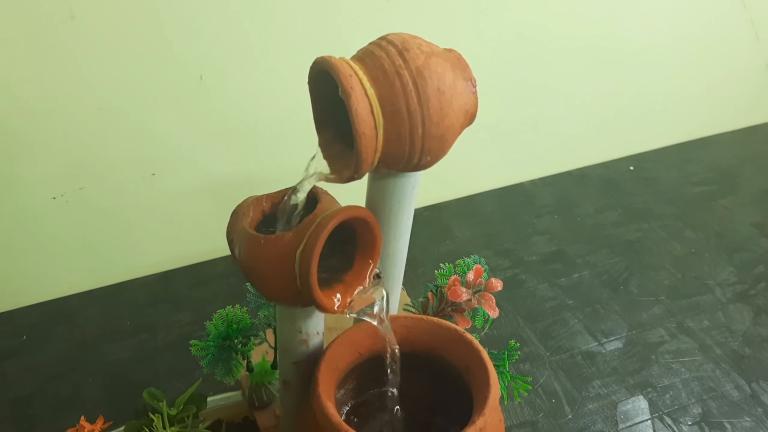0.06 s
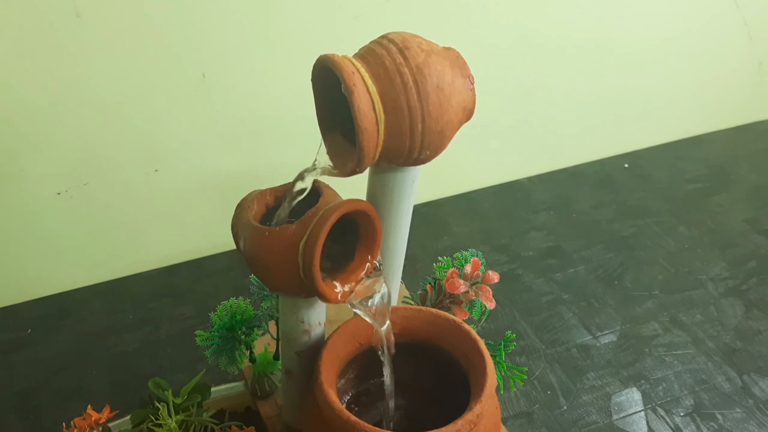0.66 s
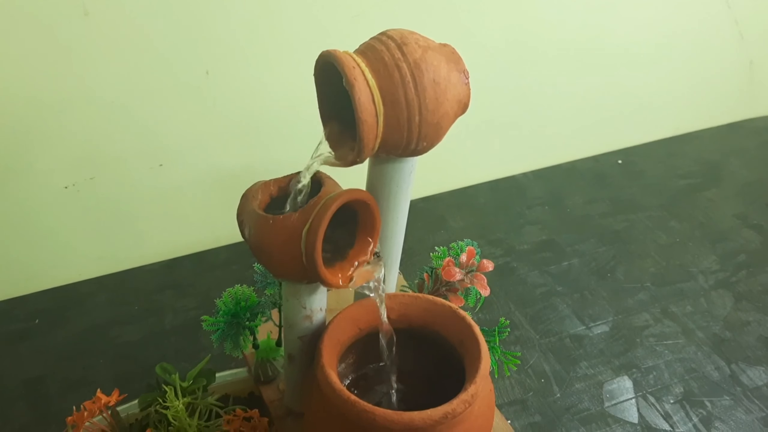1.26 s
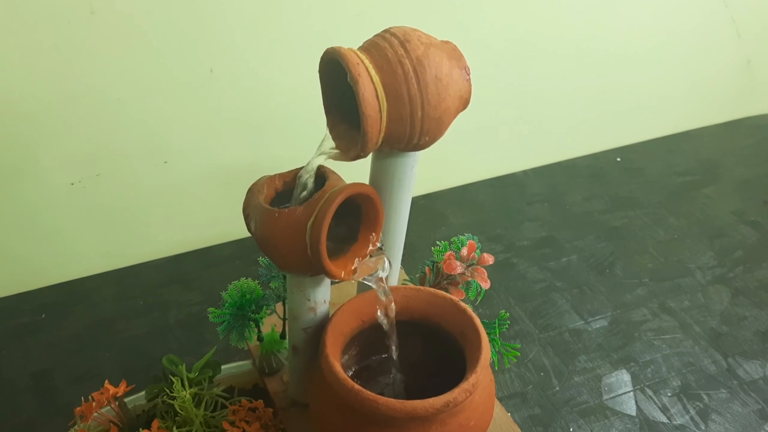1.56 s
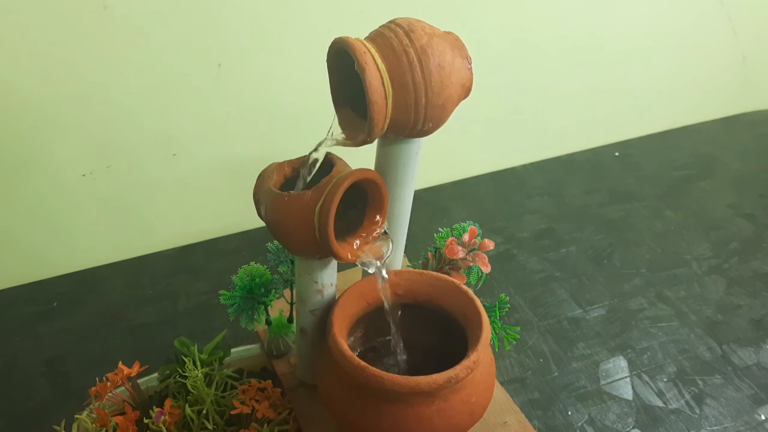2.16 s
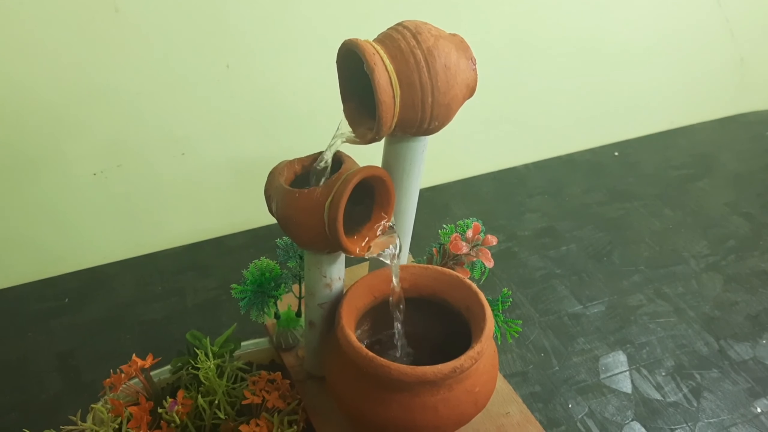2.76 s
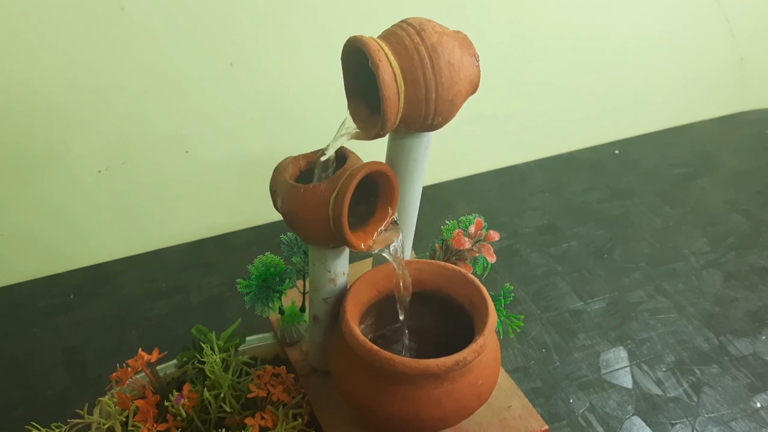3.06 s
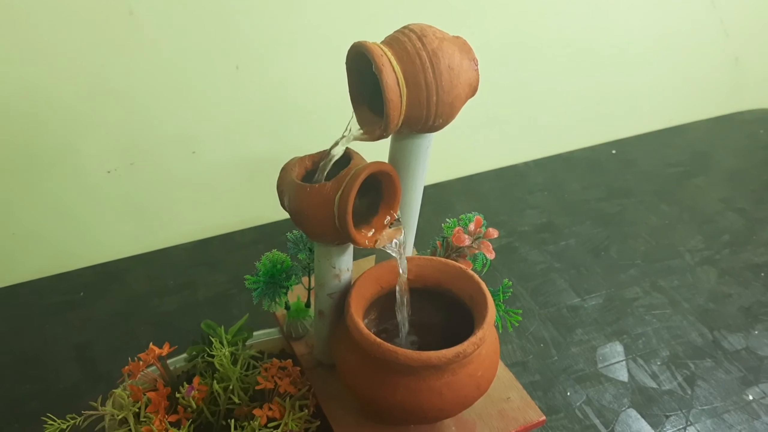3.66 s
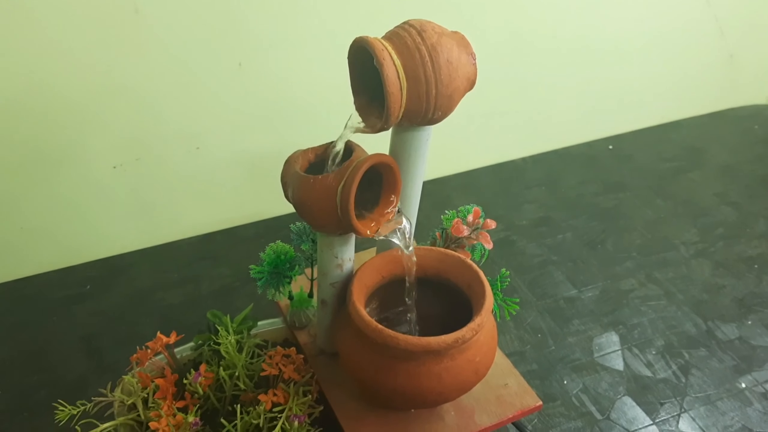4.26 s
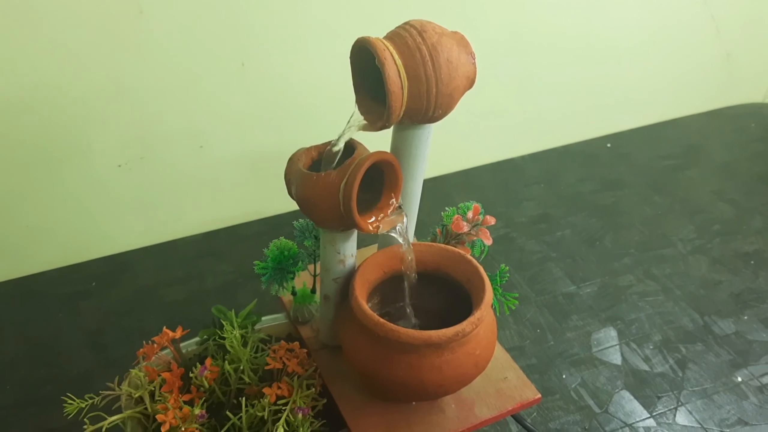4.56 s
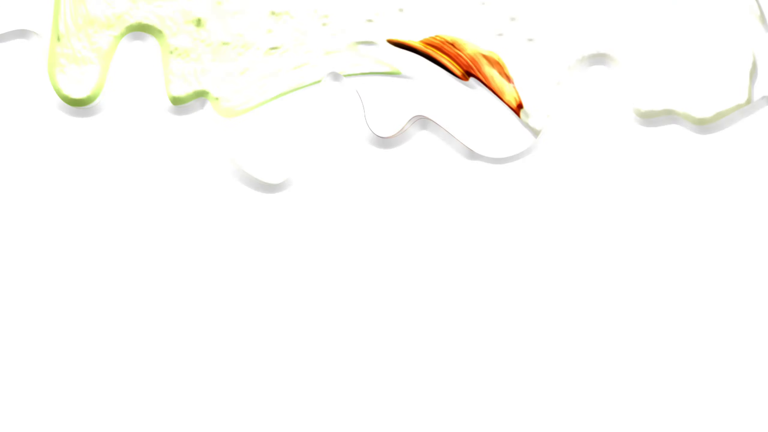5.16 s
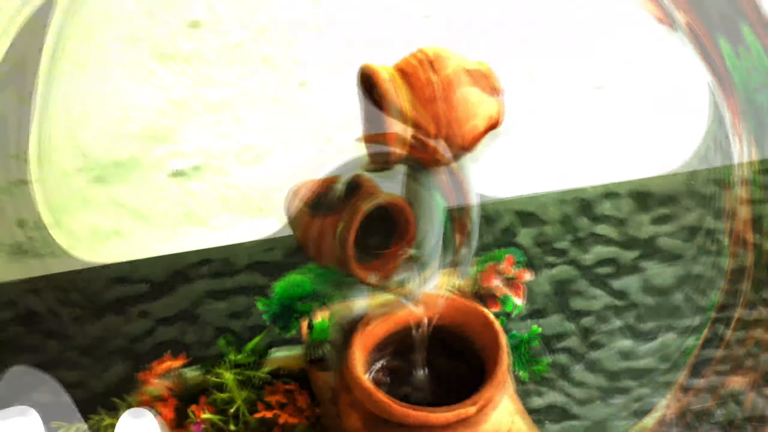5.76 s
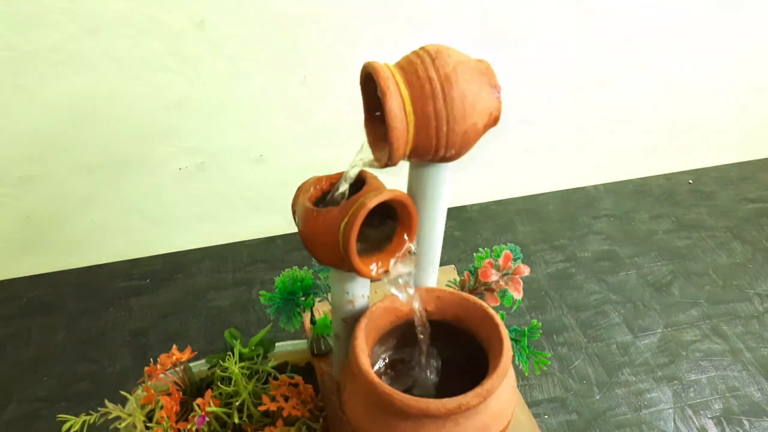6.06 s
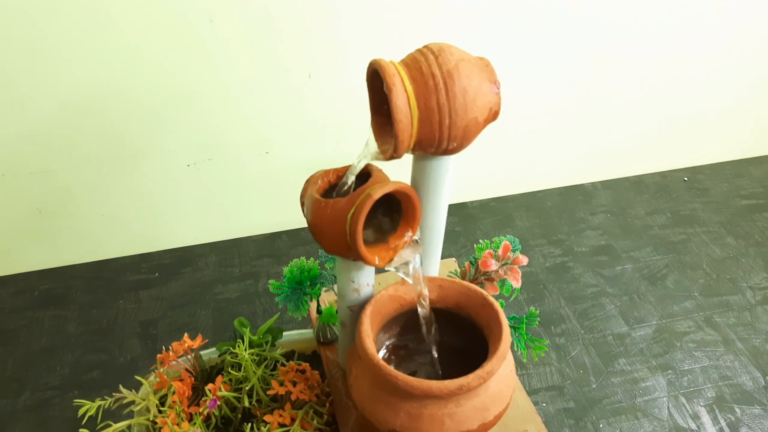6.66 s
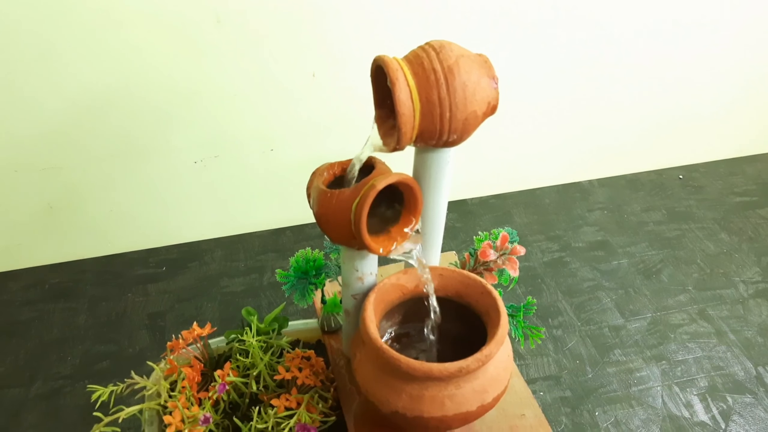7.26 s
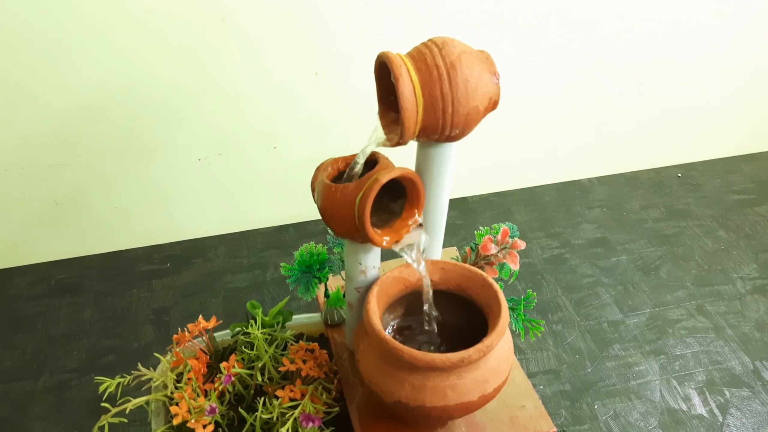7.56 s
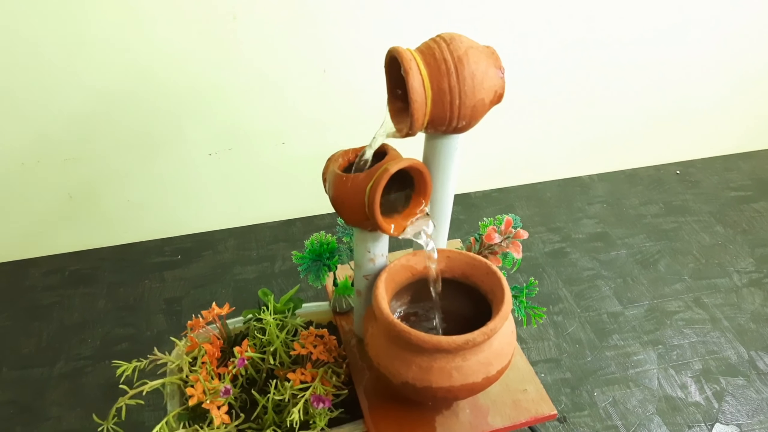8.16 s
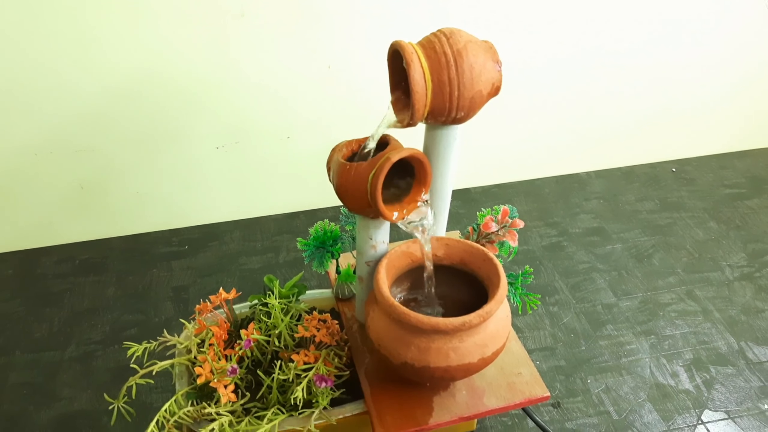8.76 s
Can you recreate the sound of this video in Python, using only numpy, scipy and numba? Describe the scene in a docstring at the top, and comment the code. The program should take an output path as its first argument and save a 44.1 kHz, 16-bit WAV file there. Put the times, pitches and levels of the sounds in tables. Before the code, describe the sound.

A small tabletop fountain of clay pots runs for about nine seconds, heard close by and slightly to the left in a quiet room. From the start, a thin stream breaks into drops that tick and patter on the water in the bottom pot, with a fine crackle of spray and many tiny bubbles that ring briefly. Underneath, soft plops give the pot a hollow gurgling note that keeps sliding up and down. The hardest plunge comes at about 3.1 seconds, and a sharp, bright splat follows at 5.7 seconds. From roughly 6.7 to 7.4 seconds the drops crowd together into a busier splashing, then thin out again while the trickle carries on to the end. Throughout, the pot walls and the room add a light echo over a faint, broad hiss.

```python
"""A small tabletop fountain of clay pots, heard from close by in a quiet room.
From the start a thin stream breaks into drops: they tick on the water and trap bubbles that ring briefly.
The stream plops in the pot, whose hollow note slides up and down; the hardest plunge comes at 3.1 s.
A sharp splat follows at 5.7 s, and the drops crowd together from about 6.7 to 7.4 s, then thin out.
All along, the pot wall and the room echo the water over a faint broad hiss."""
import sys
import numpy as np
from scipy import signal
from scipy.fft import rfft, irfft
from scipy.io import wavfile
from numba import njit

SR = 44100
rng = np.random.default_rng(int(sys.argv[2]) if len(sys.argv) > 2 else 0)


def persist_wave(psi):
    """Save psi, clipped to +-1, as 16-bit WAV."""
    counts = np.round(np.clip(psi, -1, 1) * 32767).astype(np.int16)
    wavfile.write(sys.argv[1], SR, np.atleast_2d(counts).T)


N = 388521

# Levels in the tables are relative: the mix sets how loud each layer ends up.
# Big trapped bubbles: start_s, level_db, pitch_hz, ring_cycles, climb_share (pitch rise per ring time)
BIG_BUBBLES = [(0.063, -18, 2380, 4.3, 0.19), (0.063, -22, 4850, 3.8, -0.013),
               (0.1263, -14.5, 3130, 2.4, 0.086), (0.1668, -32, 1710, 6.6, 0.081),
               (0.2345, -32, 4050, 6.1, 0.032), (0.2675, -21, 3160, 6, 0.26), (0.283, -34, 4430, 5, -0.024),
               (0.4193, -25.5, 3570, 3.7, -0.025), (0.456, -37, 1210, 3.8, -0.023),
               (0.531, -22.5, 2400, 4.8, -0.034), (0.5825, -23, 2260, 3, 0.08),
               (0.6363, -28.0, 2270.0, 5.8, 0.11), (0.6588, -31, 4350, 8.3, 0.012),
               (0.6793, -21.5, 3100.0, 2.5, 0.11), (0.7672, -29.5, 1690.0, 4.2, 0.055),
               (0.7767, -31, 1780.0, 1.2, 0.15), (0.808, -23.5, 4560, 4.3, 0.018),
               (0.872, -22.5, 2720, 6.6, 0.057), (0.8728, -28, 1740, 6.1, 0.12),
               (0.9622, -18.5, 2060, 1.3, 0.023), (1.0416, -24.5, 2270.0, 2.3, 0.21),
               (1.116, -35, 3570, 4.6, -0.0051), (1.1807, -27, 3530.0, 5.1, -0.05),
               (1.2389, -42.5, 1290, 8.9, 0.071), (1.275, -32, 2750, 3.5, 0),
               (1.306, -32.5, 4400, 5, -0.018), (1.3375, -32, 3300, 7.0, 0.0),
               (1.354, -36, 2970, 4.5, -0.039), (1.5123, -22, 1840, 0.62, 0.015),
               (1.515, -42, 1480, 7.8, 0), (1.5854, -33, 3340.0, 5.5, 0.11),
               (1.6215, -29.5, 2110, 3.3, 0.11), (1.6477, -32.0, 2140, 6.5, -0.013),
               (1.8331, -29.5, 2310, 3.8, 0.18), (1.851, -37, 1340.0, 3.6, 0.0),
               (1.8888, -33.5, 1770, 9.2, 0.47), (1.911, -27, 1970, 2.8, -0.018),
               (1.9787, -24, 4860.0, 3.7, -0.013), (2.122, -27, 4960, 4.2, 0.028),
               (2.243, -30, 3480, 7.0, 0.13), (2.2703, -30, 3300.0, 5.8, 0.08),
               (2.3622, -24, 1910.0, 1.6, -0.077), (2.3711, -27, 1590, 3.5, -0.012),
               (2.462, -28.5, 4670.0, 4.3, 0.036), (2.5067, -22, 4900, 5.1, -0.062),
               (2.6031, -32.5, 2240, 7.5, 0.2), (2.6132, -31.5, 1890, 4.7, 0.19),
               (2.6552, -31.0, 1620, 4.9, 0.068), (2.768, -29, 2070, 7.8, 0.097),
               (2.793, -23, 2800, 1.7, 0.02), (2.879, -26.5, 3390, 5.1, -0.038),
               (2.9, -23.5, 4620.0, 4.7, -0.0058), (2.939, -32.5, 1940, 9.0, 0.17),
               (2.9524, -23.5, 5330, 3, -0.067), (2.9667, -29, 4090.0, 3.6, 0.043),
               (2.9927, -33, 1500, 4.9, 0.28), (3.044, -29.5, 2990, 7.0, 0.04),
               (3.056, -28, 2480, 7.0, -0.085), (3.1873, -34, 1210, 1.6, 0.14),
               (3.1967, -26.5, 4490.0, 5.1, 0.26), (3.361, -31, 3760, 11.4, 0.21),
               (3.4312, -30.5, 3070.0, 5.5, 0.17), (3.4445, -26, 2060.0, 5.5, 0.4),
               (3.4675, -24, 1310.0, 0.9, 0.44), (3.493, -35.5, 1970, 11, 0.076),
               (3.5866, -23, 2160, 5.1, 0.11), (3.7076, -28, 1850, 3.8, -0.041),
               (3.7965, -18.5, 2240, 4.4, 0.19), (3.891, -26, 3060, 5.2, 0.058),
               (3.91, -29.5, 1730, 3.5, 0.08), (4.1029, -27.5, 2600.0, 4.9, -0.05),
               (4.112, -26, 2110, 1.2, 0.074), (4.169, -29.5, 4030, 5.1, 0.065),
               (4.4386, -24.5, 2900, 4.9, 0.03), (4.5124, -12.5, 2160, 3.7, 0.12),
               (4.6942, -34, 2870, 4.3, 0.13), (4.8135, -32, 1730.0, 3.1, 0.36),
               (4.865, -18.0, 3000, 1.6, 0.069), (4.872, -33.0, 1300, 1.9, 0.041),
               (4.9334, -25.5, 2120.0, 5.7, 0.17), (4.9571, -32.5, 1720.0, 3.3, 0.052),
               (4.99, -25.5, 2450.0, 3.8, -0.011), (5.1673, -28.5, 4050, 3.8, 0.16),
               (5.2621, -17.5, 2040.0, 3, -0.0039), (5.333, -29, 3840, 6.8, 0.023),
               (5.4243, -28, 3550, 9.4, 0.04), (5.4686, -29.5, 2160, 8.8, 0.48),
               (5.5318, -29.5, 5290.0, 5.5, -0.034), (5.6344, -24, 2700.0, 1.5, -0.05),
               (5.6458, -31, 2700.0, 3.3, -0.05), (5.6554, -27.5, 2730, 5.8, 0.014),
               (5.7886, -28.5, 2200, 4.8, 0.15), (5.8343, -23, 2500, 3.8, 0.074),
               (5.9054, -21, 2790.0, 3.1, 0.15), (6.022, -33.5, 3250.0, 9.7, 0.05),
               (6.0958, -28.5, 2860, 7.0, 0.025), (6.178, -31, 2080, 8.3, -0.03),
               (6.3718, -29.5, 3700, 5.7, 0.04), (6.6603, -34.0, 1700, 3.3, 0.31),
               (6.7224, -20.0, 1830.0, 1.5, 0.11), (6.7382, -18.5, 4700, 7.0, -0.09),
               (6.7525, -31, 1800.0, 5.5, 0.14), (6.7733, -23, 4130.0, 6.6, 0.04),
               (6.8196, -26.5, 2900.0, 3.3, 0.11), (6.8952, -25, 3460, 6.6, 0.12),
               (6.912, -26, 2550.0, 2.9, 0.028), (6.9484, -25.5, 2360, 7.0, 0.044),
               (6.9695, -28, 2010.0, 10, -0.025), (6.9844, -28, 2040, 6.3, 0.24),
               (7.0004, -25.5, 1570, 7.0, 0.34), (7.011, -26.5, 2260, 3.2, 0.19),
               (7.092, -37, 3570.0, 7.0, 0.0), (7.1287, -25, 1950, 3.7, 0.21),
               (7.1755, -32, 3000.0, 8.2, -0.016), (7.2802, -31.5, 2200, 8.1, 0.17),
               (7.311, -18.5, 2530, 4.3, 0.062), (7.362, -30.5, 4370.0, 4.7, 0.051),
               (7.403, -13, 2400, 2.2, 0.057), (7.4271, -36, 2460, 5.3, 0.059),
               (7.6409, -25.5, 5000, 4.1, -0.099), (7.646, -37.5, 1015, 10, 0.34),
               (7.6615, -31.5, 1860.0, 6, 0.097), (7.674, -26, 2900, 4.3, 0.11),
               (7.7411, -30, 2910, 9.9, -0.083), (7.777, -30, 1880, 2.6, 0.19),
               (7.789, -21.0, 2200, 1.8, 0.08), (7.8661, -23, 2410, 2.8, 0.03),
               (7.867, -11.5, 4900, 2.5, 0.04), (8.0841, -33.5, 1680, 8.1, 0.14),
               (8.1483, -32, 1420, 7.0, 0.39), (8.1569, -37, 1670.0, 5.5, -0.041),
               (8.301, -34, 1150.0, 3.2, 0.32), (8.3803, -29, 2130, 6.6, 0.23),
               (8.3876, -30, 2380, 10, 0.014), (8.4146, -31, 2040.0, 2.8, -0.021),
               (8.425, -31, 2550.0, 4.9, 0.0), (8.4644, -31, 4810.0, 4.8, 0.0),
               (8.5448, -26, 1920, 2.3, 0.093), (8.567, -28.5, 2120, 2, 0.11),
               (8.7171, -26.5, 4600, 10, -0.069), (8.7678, -21.5, 2930, 1.6, 0.04)]
# The sharpest drop impacts: start_s, level_db, pitch_hz
DROP_HITS = [(0.0165, -24.5, 7300), (0.0628, -20.5, 10500), (0.14, -27, 9000), (0.158, -25.5, 8000),
             (0.198, -29, 7500), (0.4202, -22.5, 10500), (0.463, -27, 10500), (0.531, -26, 5540),
             (0.564, -24.5, 8800), (0.579, -38, 2600), (0.637, -35, 8500), (0.8715, -31, 1980),
             (0.931, -25.5, 8200), (0.9607, -21, 6430), (1.039, -22, 8800), (1.0944, -23, 12400),
             (1.235, -29.5, 8500), (1.3882, -26, 9490), (1.429, -35, 8500), (1.692, -22.5, 11000),
             (1.829, -34, 8500), (1.891, -29, 8450), (1.962, -25.5, 11100), (2.2088, -24, 11000),
             (2.4228, -24.5, 7950), (2.681, -33, 8600), (2.769, -26, 8800), (2.7928, -21.5, 6430),
             (2.8772, -23.5, 6500), (2.9497, -26, 7900), (3.0598, -18.5, 7200), (3.139, -22, 6440),
             (3.146, -23, 8000), (3.1785, -25, 10800), (3.295, -23.5, 6500), (3.3298, -27, 7300),
             (3.413, -32, 8600), (3.596, -25, 8400), (3.633, -25.5, 8800), (3.764, -21, 8600),
             (3.803, -17.5, 9500), (3.978, -22, 10600), (4.1077, -23, 6900), (4.135, -22.5, 7560),
             (4.286, -31, 8550), (4.366, -24, 8800), (4.3974, -23, 10300), (4.5118, -20.5, 10300),
             (4.6464, -23.5, 9300), (4.6936, -25, 8250), (4.732, -25, 7500), (4.8185, -30, 8800),
             (4.8382, -19, 11000), (4.8584, -25, 6430), (4.92, -25, 8500), (4.932, -33, 2800),
             (5.0287, -24.5, 7100), (5.127, -31, 10500), (5.318, -24, 7500), (5.4208, -23.5, 8290),
             (5.462, -24, 8000), (5.484, -26, 9200), (5.5514, -27, 8100), (5.707, -12.5, 6800),
             (5.7833, -21, 8600), (5.834, -24, 8500), (5.914, -19.5, 8000), (6.0366, -28.5, 8080),
             (6.0845, -22, 10000), (6.1085, -23.5, 7700), (6.224, -24, 7200), (6.355, -26.5, 10600),
             (6.5739, -23, 7800), (6.62, -24, 10600), (6.661, -24, 8050), (6.695, -22.5, 7100),
             (6.7253, -23.5, 6300), (6.738, -20, 7600), (6.771, -22.5, 5330), (6.8039, -21.5, 8380),
             (6.818, -32, 4560), (6.8487, -18, 9900), (6.8947, -24.5, 9600), (6.927, -31, 6800),
             (6.946, -21, 5150), (6.968, -27, 2840), (6.978, -28, 8500), (7.0005, -32, 3000),
             (7.1267, -16, 12400), (7.19, -28, 8400), (7.2324, -19, 7600), (7.2757, -20, 9500),
             (7.3107, -17.5, 11100), (7.3712, -24, 10700), (7.3865, -15, 12100), (7.4027, -22, 12000),
             (7.657, -19, 8060), (7.814, -25.5, 8500), (7.8665, -38, 5570), (7.92, -27, 9000),
             (8.0155, -22, 6660), (8.056, -22.5, 7700), (8.267, -24.5, 6600), (8.4038, -23, 7700),
             (8.463, -22.5, 8200), (8.7163, -20, 10200), (8.762, -24, 8300)]
# Tone of the drop impacts: frequency_hz, gain_db
DROP_TONE = [(100, -11), (600, -17), (2000, 7.5), (5000, -2), (10000, 1), (15000, -0.5)]
# Deep plunges that knock on the air in the pot: start_s, level_db, pitch_hz
DEEP_PLUNGES = [(0.108, -42, 680), (0.141, -37, 680), (0.294, -40, 660), (0.346, -41, 620),
                (0.42, -39, 650), (0.53, -34, 590), (0.613, -34.5, 711), (2.133, -29.5, 760),
                (2.362, -31, 564), (2.992, -35.5, 556), (3.055, -31.5, 574), (3.122, -21.5, 586),
                (3.185, -37.5, 633), (3.467, -36.5, 619), (4.071, -37, 568), (4.11, -29.5, 605),
                (4.167, -35, 619), (4.577, -37.5, 608), (4.881, -34, 576), (5.064, -38, 674),
                (5.261, -36, 610), (5.317, -34.5, 560), (5.518, -35.5, 527), (5.545, -33, 540),
                (6.178, -36, 683), (6.659, -34.5, 590), (6.723, -27, 670), (6.754, -27, 640),
                (6.847, -35.5, 537), (6.95, -33, 603), (7.007, -38, 530), (7.056, -35, 560),
                (7.281, -35, 726), (7.303, -37.5, 680), (7.788, -33, 684), (7.867, -36.5, 720),
                (7.965, -34, 666), (8.013, -36, 630), (8.145, -39, 720), (8.175, -34.5, 824),
                (8.425, -35.5, 655), (8.615, -35, 557)]
# Tone of the small bubbles: frequency_hz, gain_db
BUBBLE_TONE = [(300, 4), (900, -7), (1350, -3), (1700, -0.5), (2300, 2.5), (3000, 1.5), (4400, 2),
               (6000, 2), (10000, 3)]
# Tone of the spray: frequency_hz, gain_db
SPRAY_TONE = [(300, -9), (1500, -2), (4000, -9.5), (6000, -16.5), (8200, -0.5), (11000, 1), (15000, 1.5)]
# Slow changes of the stream: time_s, small_bubbles_db, spray_db
STREAM_LEVELS = [(0.0, -47, -56), (0.68, -46, -51.5), (0.91, -48.5, -54.5), (1.03, -47, -52),
                 (2.43, -46.5, -51.5), (2.77, -44, -52.5), (3.75, -47.5, -54.5), (4.93, -44.5, -49.5),
                 (5.23, -45.5, -54.5), (5.62, -46, -54.5), (6.48, -47, -54), (6.65, -46, -60),
                 (6.79, -42, -57), (6.89, -43.5, -48), (7.8, -48.5, -59), (8.27, -41.5, -46),
                 (8.51, -44.5, -50.5), (8.81, -44.5, -59)]
# Note of the air pocket that the stream keeps opening and closing: time_s, pitch_hz
POCKET_NOTE = [(0, 653), (.2, 630), (.3, 615), (.53, 600), (.62, 710), (.75, 610), (1.0, 600), (1.18, 740),
               (1.4, 576), (1.65, 560), (1.77, 776), (1.87, 637), (1.97, 540), (2.14, 805), (2.26, 594),
               (2.45, 545), (2.56, 623), (2.75, 543), (3.0, 540), (3.13, 570), (3.28, 790), (3.38, 660),
               (3.55, 600), (3.65, 750), (3.75, 600), (3.95, 700), (4.08, 580), (4.35, 690), (4.6, 590),
               (4.73, 780), (4.86, 564), (5.03, 680), (5.3, 600), (5.55, 557), (5.8, 600), (6.25, 710),
               (6.4, 600), (6.5, 710), (6.85, 587), (7.05, 550), (7.28, 730), (7.48, 800), (7.6, 600),
               (7.77, 640), (7.88, 730), (7.97, 706), (8.08, 517), (8.18, 804), (8.24, 760), (8.37, 945),
               (8.43, 670), (8.6, 574), (8.81, 620)]
# Notes of the air in the pots: pitch_hz, width_hz, gain_db
POT_NOTES = [(165, 43, 2), (395, 30, -0.5), (627, 176, -4.5), (1019, 50, -0.5)]
# Tone of the room's hiss: frequency_hz, gain_db
HISS_TONE = [(20, -5.5), (45, -27), (75, -11), (130, -6), (175, -6), (230, -11.5), (390, -6.5), (800, -8.5),
             (3000, -5.5), (15000, -19)]

BUBBLE_SWELL_SHARE = 0.43  # a bubble swells over this share of its ring time
WATER_PAN_DB, IMPACT_PAN_DB, HISS_PAN_DB = 4, 2, 1.5  # how much louder on the left


def clear_bubbles():
    """Big trapped bubbles swell and ring, most chirping up as they rise; three small ones form by each."""
    s, db, hz, cycles, glide = np.transpose(BIG_BUBBLES)
    cycles = np.maximum(cycles, 1)
    rise = BUBBLE_SWELL_SHARE * cycles
    big = ring(s, hz, db + swell_loss_db(cycles, rise), cycles, glide, rise,
               pan_db=-1.5, lag_s=2e-5, glide_spread=0.13)
    s, db, hz = np.repeat([s, db, hz], 3, axis=1)
    late, pitch = scatter(len(s), size=2)
    s = s + 0.000332 + 0.0024 * np.abs(late)
    hz = hz * 2 ** (0.35 + .48 * pitch)
    small = ring(s, hz, db - 9, cycles=2.2, glide=0.081, rise=0.5, pan_db=11.5, lag_s=2e-5)
    return big + small


def splats():
    """A drop slaps the water and shatters into 24 clicks; the stragglers are weaker."""
    faint = drips(count=24, db=-32, hz=8100, spread_db=3.3, spread_octaves=0.19)
    s, db, hz = np.repeat(np.vstack([DROP_HITS, faint]), 24, axis=0).T
    late, pitch = rng.standard_normal((len(s), 2)).T
    s = s + 0.000714 + 0.0011 * np.abs(late) ** 1.7
    clicks = ring(s, hz * np.exp(.25 * pitch), db - 4 * np.abs(late),
                  cycles=1.7, glide=0.039, rise=0.41, pan_db=1.0, lag_s=2.8e-5)
    return colour(clicks, DROP_TONE)


def plunges():
    """A whole blob dives in and gives the air one push; the water slaps shut, higher and weaker."""
    s, db, hz = np.transpose(DEEP_PLUNGES)
    cycles, rise, delay_s = 0.97, 0.58, 0.0012
    db = db + swell_loss_db(cycles, rise)
    shape = dict(cycles=cycles, glide=0.04, rise=rise, pan_db=3.0, lag_s=3e-5)
    push = ring(s + delay_s, hz, db, **shape)
    slap = ring(s + delay_s, hz * 1.4, db - 7, **shape)
    return push + slap


def small_bubbles():
    """A steady babble of little bubbles, each a short rising chirp."""
    s, db = patter(count=620, size=7, burst_s=.006, spread_db=5)
    pitch, length = scatter(len(s), size=2)
    hz, cycles = 2350 * np.exp(.54 * pitch), 3.5 * np.exp(.35 * length)
    db = db + 10 * np.log10(hz / cycles)  # a longer ring spreads its energy over a smaller swing
    babble = ring(s, hz, db, cycles, glide=0.102, rise=BUBBLE_SWELL_SHARE * cycles,
                  pan_db=3.5, lag_s=2.5e-5)
    return level(colour(babble, BUBBLE_TONE), -0.46)


def spray():
    """Fine droplets crackle on the water and the clay."""
    s, db = patter(count=440, size=10, burst_s=.003, spread_db=8.5)
    pitch, length = scatter(len(s), size=2)
    hz, cycles = 7800 * np.exp(.42 * pitch), 2.0 * np.exp(.6 * length)
    crackle = ring(s, hz, db, cycles, glide=0.027, rise=0.2, pan_db=4.0, lag_s=2.6e-5)
    return level(colour(crackle, SPRAY_TONE), 3.6)


def plops():
    """The stream punches short-lived dents into the water: soft, low pushes on the air."""
    s, db = patter(count=420, size=5, burst_s=.008, spread_db=2.0)
    hz = 800 * np.exp(0.29 * rng.standard_normal(len(s)))
    pushes = ring(s, hz, db, cycles=.8, glide=0.088, rise=0.32, pan_db=2.0, lag_s=3e-5)
    return level(pushes, -2.15)


def flow():
    """The stream wavers, moving plops, small bubbles and spray together; the last two also drift."""
    t = np.arange(N) / SR
    s, bubble_db, spray_db = np.transpose(STREAM_LEVELS)
    plop_db, wobble_hz = -57, 12
    chance, = scatter(count=400, size=1)
    wobble_db = 2.5 * np.interp(t * wobble_hz, np.arange(len(chance)), chance)
    return [undb(db + wobble_db) for db in (plop_db, np.interp(t, s, bubble_db), np.interp(t, s, spray_db))]


def drips(count, db, hz, spread_db, spread_octaves):
    """Drops leave the stream at a loosely even pace: start_s, level_db, pitch_hz."""
    s = (np.arange(count) + rng.random(count)) * N / SR / count
    strength, pitch = scatter(count, size=2)
    return np.column_stack([s, db + spread_db * strength, hz * 2 ** (spread_octaves * pitch)])


def patter(count, size, burst_s, spread_db):
    """Times and levels for `count` bursts of `size` pings, one burst for each blob of the stream."""
    place, mass = rng.random((count, 2)).T[..., None]
    blob_s = (np.arange(count)[:, None] + 2 * place - .5) * N / SR / count
    s = blob_s + burst_s * rng.exponential(size=(count, size))
    db = spread_db * (mass ** 2 + 2 * rng.random((count, size)) ** 2)  # most are faint, a few strong
    return s.ravel(), db.ravel()


def ring(s, hz, db, cycles, glide, rise, pan_db, lag_s, glide_spread=0.498):
    """Pings scattered over the water: each reaches one side a little sooner, and one side louder."""
    pan, lag, climb = scatter(len(s), size=3)
    hz = np.clip(hz, 100, .4 * SR)
    cycles = np.clip(cycles, .4, np.full(len(s), 20))
    rise = np.maximum(rise, np.full(len(s), .01))
    glide = glide * np.exp(glide_spread * climb)
    return np.array([pings(s + side * lag_s * lag, hz, undb(db + side * pan_db * pan), cycles, glide, rise)
                     for side in (.5, -.5)])


@njit
def pings(start, hz, size, cycles, glide, rise):
    """Short tones that swell over `rise` cycles, fade over `cycles` and climb by `glide` as they fade."""
    out = np.zeros(N)
    for k in range(len(start)):
        first = max(int(start[k] * SR) + 1, 0)
        for i in range(first, min(first + int(6 * cycles[k] / hz[k] * SR), N)):
            turns = (i / SR - start[k]) * hz[k]
            swell = 1 - np.exp(-turns / rise[k])
            fade = np.exp(-turns / cycles[k])
            phase = 2 * np.pi * turns * (1 + glide[k] * turns / cycles[k] / 2)
            out[i] += size[k] * swell * fade * np.sin(phase)
    return out


def swell_loss_db(cycles, rise):
    """How much of its peak a ping loses by fading while it still swells."""
    share = rise / (rise + cycles)
    return -20 * np.log10((1 - share) * share ** (rise / cycles))


def scatter(count, size):
    """`size` bell-curve random values for each of `count` pings, without extremes."""
    return np.clip(rng.standard_normal((count, size)), -2, 2).T


def undb(db):
    """Turn decibels into a gain."""
    return 10 ** (np.asarray(db) / 20)


def level(x, db):
    """Set the average (rms) level."""
    return x * undb(db) / np.sqrt(np.mean(x ** 2))


def balance(db):
    """Left and right gains, the left louder by `db`."""
    return undb(db * np.array([[.5], [-.5]]))


def colour(x, points):
    """Shape the tone along a curve of frequency_hz, gain_db points."""
    hz, db = np.transpose(points)
    f = np.maximum(np.arange(N // 2 + 1) * SR / N, 1)
    return irfft(rfft(x) * undb(np.interp(np.log(f), np.log(hz), db)), N)


def convolve(x, response):
    """Give each channel the ring or echo in `response`."""
    return signal.fftconvolve(x, response, axes=-1)[:, :N]


def gurgle(x):
    """The air pocket under the stream changes size, so its hollow note slides up and down."""
    hz = np.interp(np.arange(N) / SR, *np.transpose(POCKET_NOTE))
    return undb(1.2) * np.array([resonate(side, hz, width_hz=81.0) for side in x])


@njit
def resonate(x, hz, width_hz):
    """Let the sound ring in a narrow band around a moving pitch."""
    out, swing = np.empty(len(x)), 0j
    for i in range(len(x)):
        swing = swing * np.exp((2j * np.pi * hz[i] - np.pi * width_hz) / SR) + x[i] + 1e-18
        out[i] = swing.real * 2 * np.pi * width_hz / SR
    return out


def hollow(x):
    """The air in the pots rings at its own low pitches."""
    t = np.arange(SR // 10) / SR
    notes = sum(undb(db) * 2 * np.pi * width / SR * np.exp(-np.pi * width * t) * np.cos(2 * np.pi * hz * t)
                for hz, width, db in POT_NOTES)
    return convolve(x, notes[None])


def pot_wall(x, count, sway_hz):
    """Quick echoes inside the pot keep changing as the stream wanders over the water."""
    sway_s = np.arange(0, N / SR + 1, 1 / sway_hz)
    chances = rng.standard_normal((len(sway_s), count)).T
    shares = np.array([np.interp(np.arange(N) / SR, sway_s, row) for row in chances])
    shares = shares / np.sqrt(np.sum(shares ** 2, axis=0))
    return sum(share * convolve(x, echoes(delay_s=0.001245, fade_s=0.05, apart_hz=4430, dull_hz=8400))
               for share in shares)


def echoes(delay_s, fade_s, apart_hz, dull_hz):
    """Dense echoes that drop 60 dB in `fade_s`; left and right are alike in the bass, not the treble."""
    t = np.arange(SR // 2) / SR
    mid, side = rng.standard_normal((2, len(t)))
    side = signal.sosfilt(signal.butter(1, apart_hz, "high", fs=SR, output="sos"), side)
    tail = signal.sosfilt(signal.butter(1, dull_hz, fs=SR, output="sos"), [mid + side, mid - side])
    tail = tail * (t > delay_s) * np.exp(-np.log(1000) * t / fade_s)
    return tail / np.sqrt(np.sum(tail ** 2) / 2)


def room_hiss():
    """Faint broad hiss of the room, nearly the same on both sides."""
    mid, side = rng.standard_normal((2, N))
    return level(colour(mid + undb(-9.5) * np.array([side, -side]), HISS_TONE), -49.5)


def scene():
    """All the water sounds pass through the pot and the room; the fountain stands a little to the left."""
    plop_gain, bubble_gain, spray_gain = flow()
    bubbles = (undb(0.64) * clear_bubbles() + bubble_gain * small_bubbles()) * balance(WATER_PAN_DB)
    impacts = (undb(-1.5) * splats() + spray_gain * spray()) * balance(IMPACT_PAN_DB)
    knocks = plunges() * balance(WATER_PAN_DB)
    pushes = plop_gain * plops() * balance(WATER_PAN_DB)
    water = bubbles + impacts + undb(-6.5) * knocks
    # such small sources give off hardly any bass
    water = signal.sosfilt(signal.butter(2, 260, "high", fs=SR, output="sos"), water)
    # the soft plops are heard only through the air in the pots
    into_pots = undb(0.5) * pushes + undb(-5) * knocks + undb(-11.5) * bubbles + undb(5.0) * impacts
    water = water + undb(3.5) * (hollow(into_pots) + gurgle(into_pots))
    room = convolve(water, echoes(delay_s=0.00068, fade_s=1.0, apart_hz=2900, dull_hz=8600))
    sound = water + undb(-7.5) * pot_wall(water, count=5, sway_hz=18) + undb(-19.5) * room
    return sound + room_hiss() * balance(HISS_PAN_DB)


def record(dry):
    """Cut away the highest treble, above 15750 Hz."""
    return signal.sosfilt(signal.ellip(10, .2, 80, 15750, fs=SR, output="sos"), dry)


dry = scene()
out = record(dry)
persist_wave(out)
```